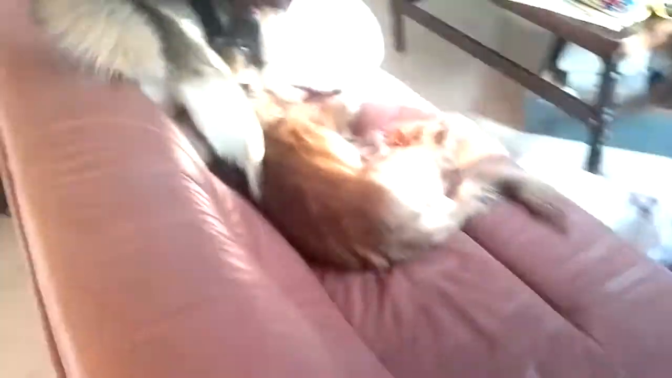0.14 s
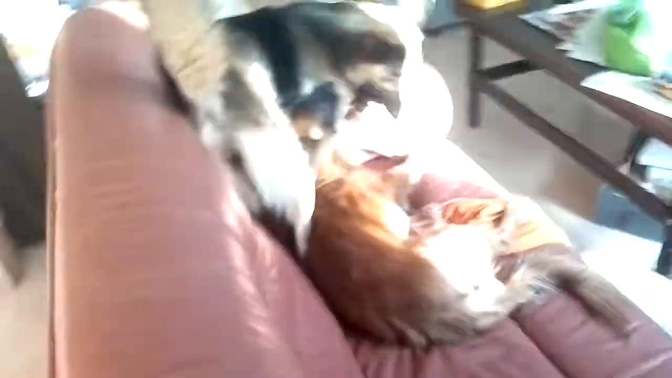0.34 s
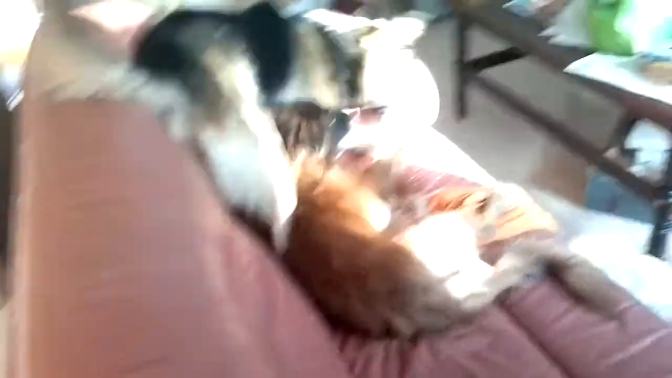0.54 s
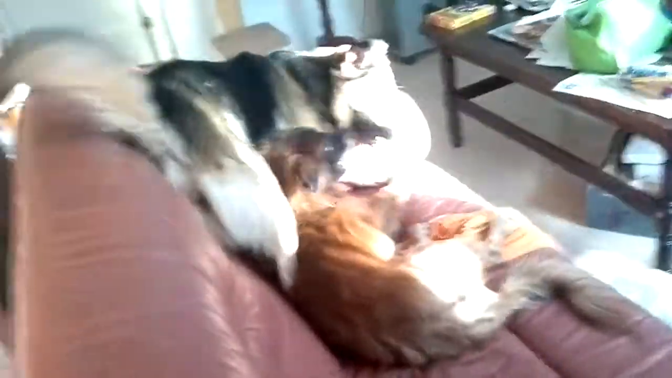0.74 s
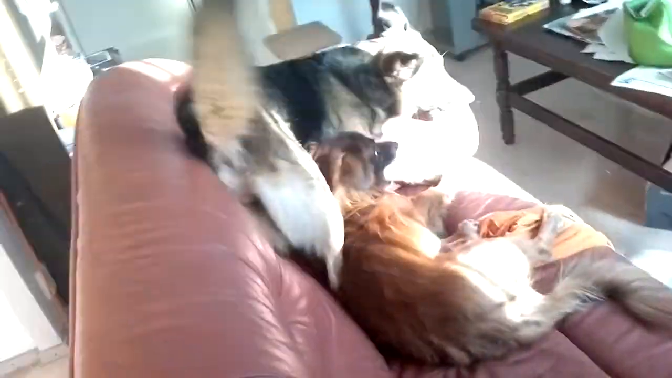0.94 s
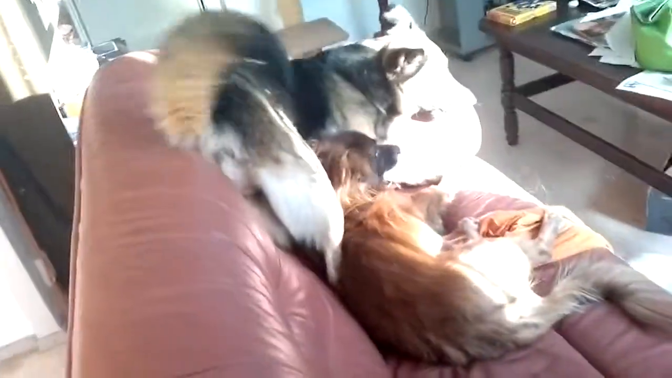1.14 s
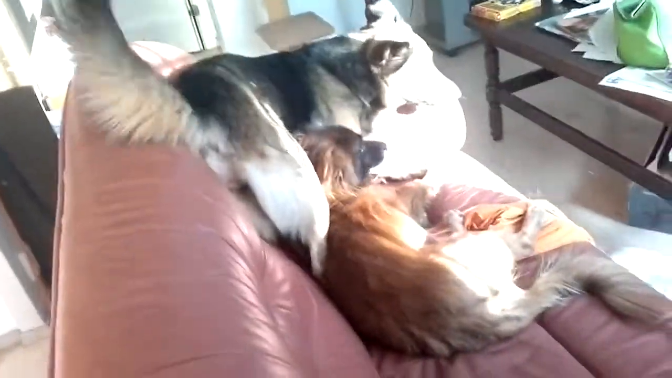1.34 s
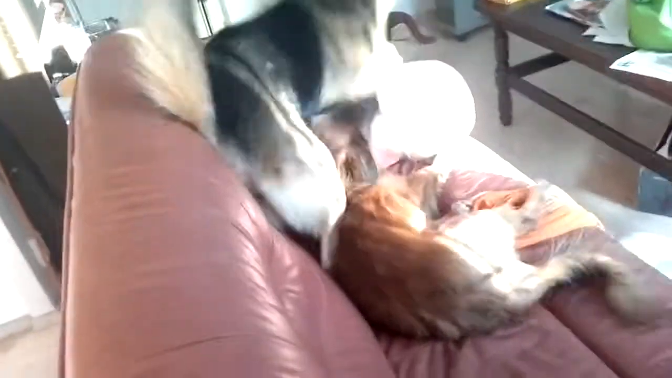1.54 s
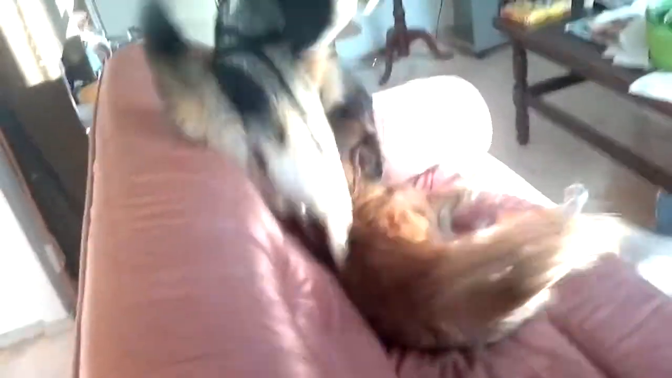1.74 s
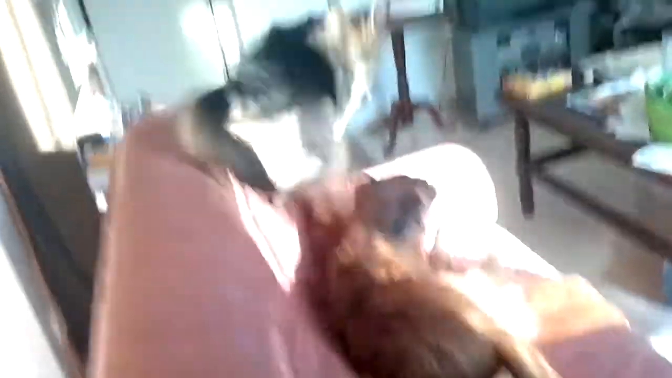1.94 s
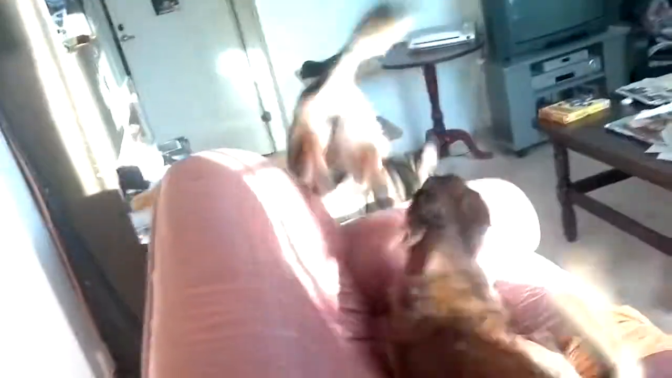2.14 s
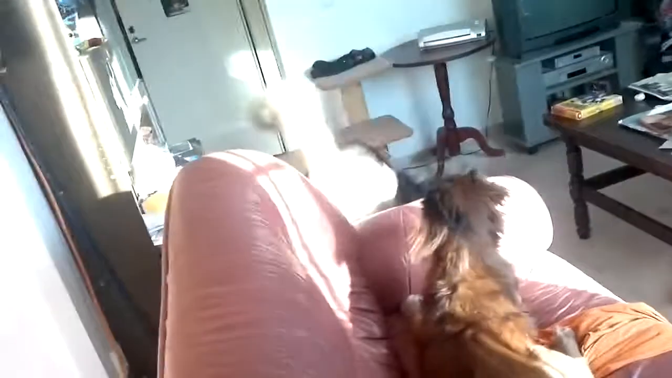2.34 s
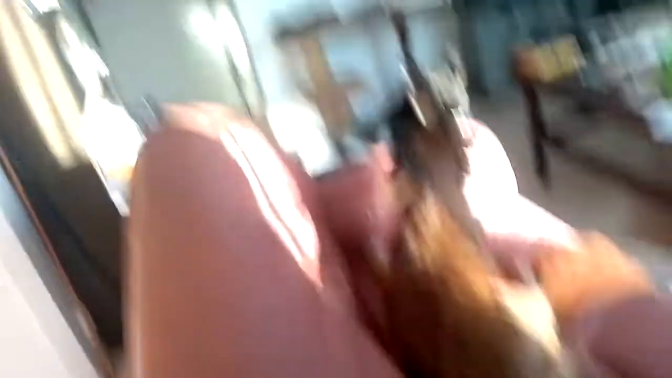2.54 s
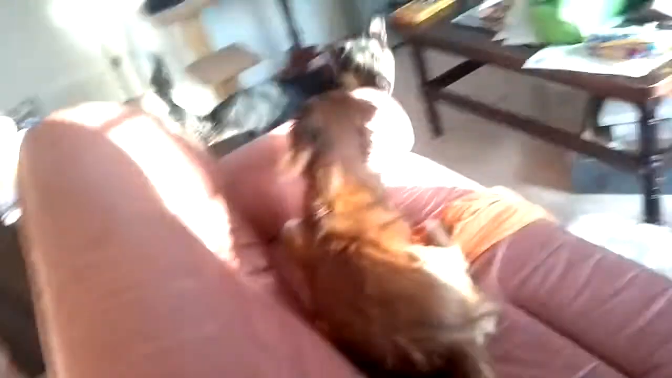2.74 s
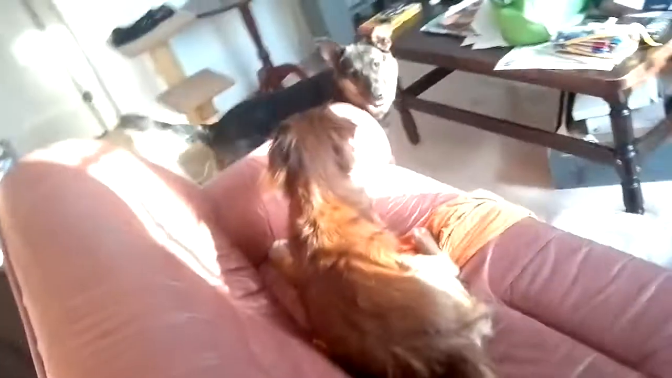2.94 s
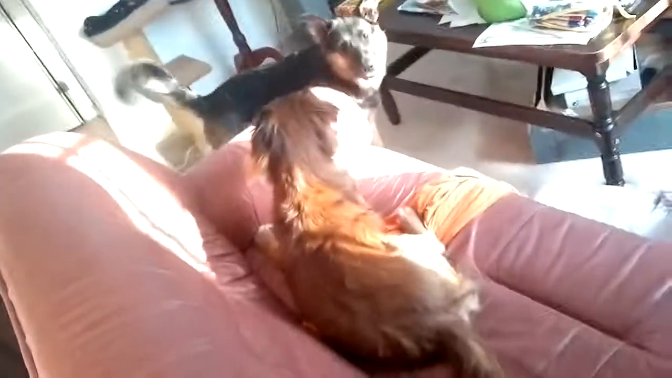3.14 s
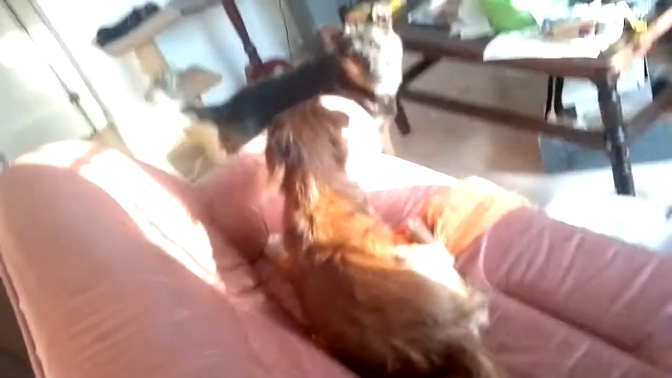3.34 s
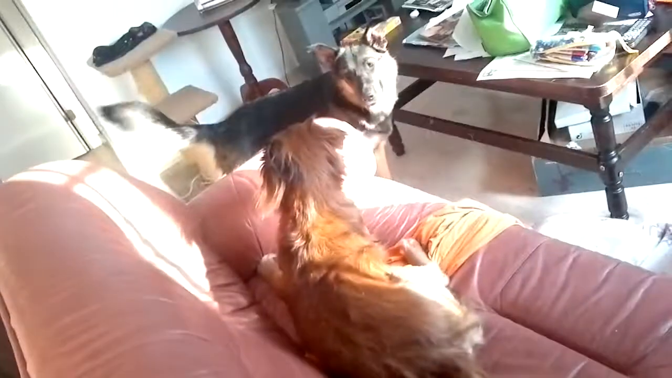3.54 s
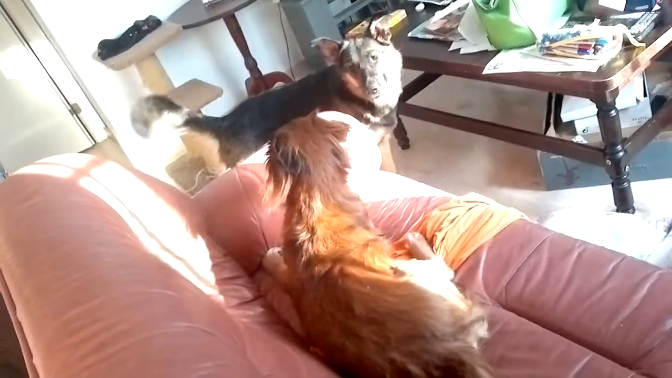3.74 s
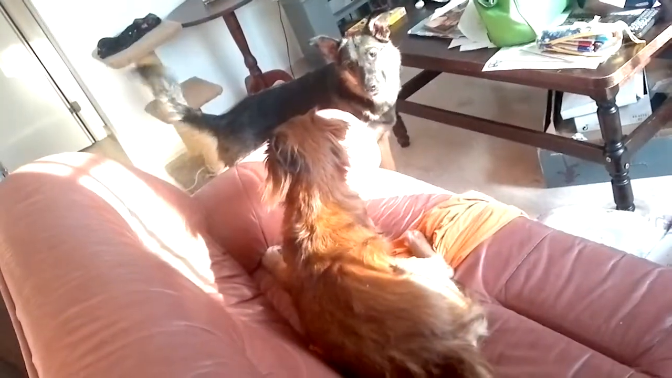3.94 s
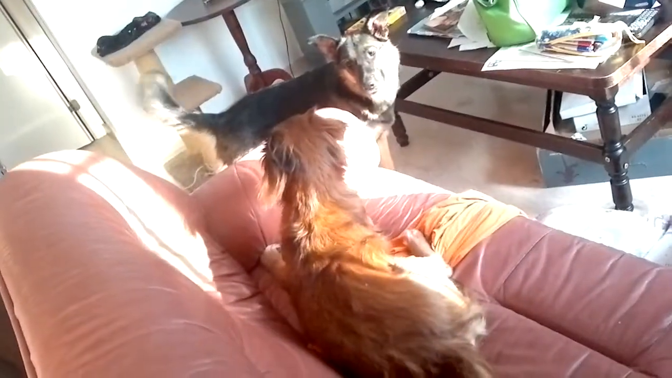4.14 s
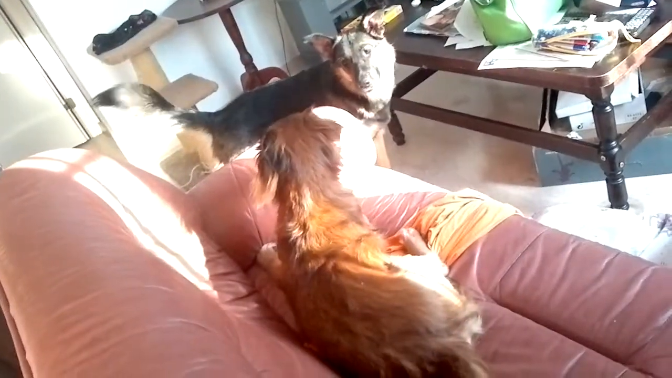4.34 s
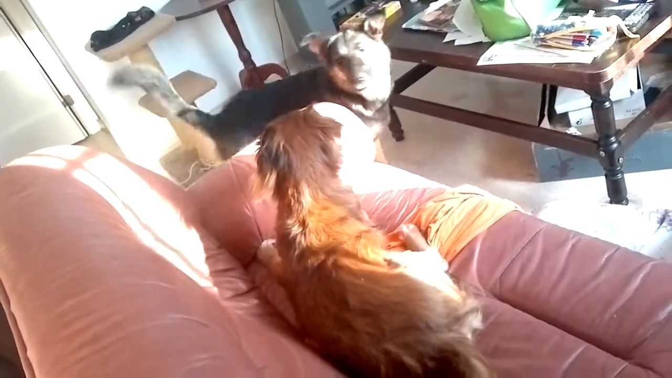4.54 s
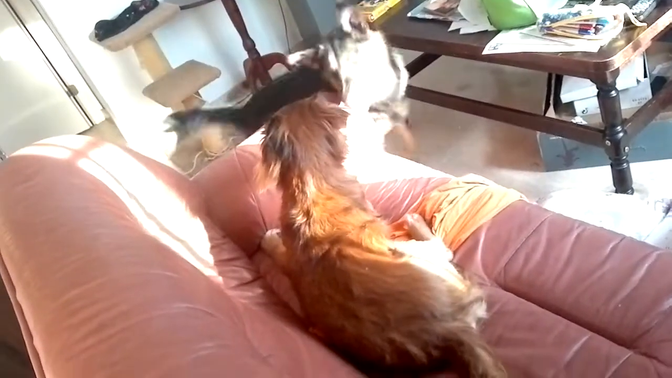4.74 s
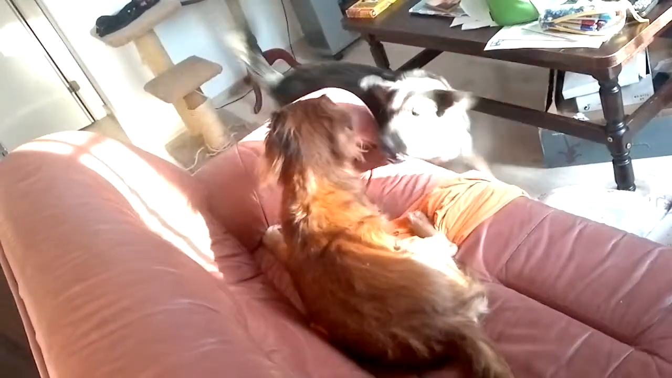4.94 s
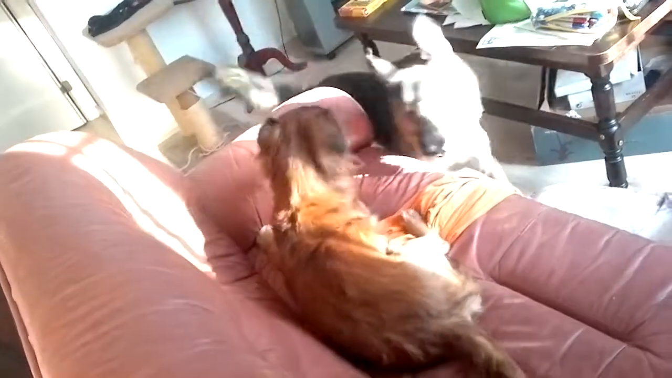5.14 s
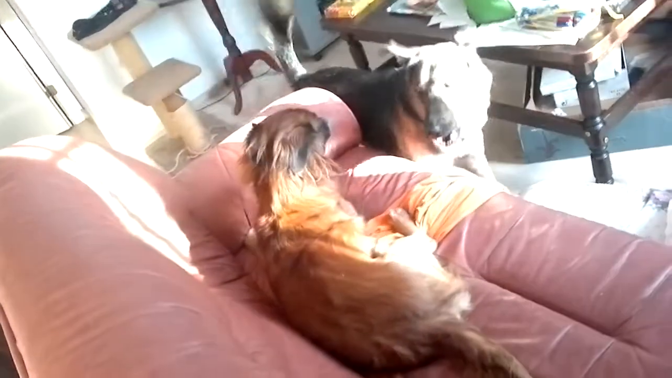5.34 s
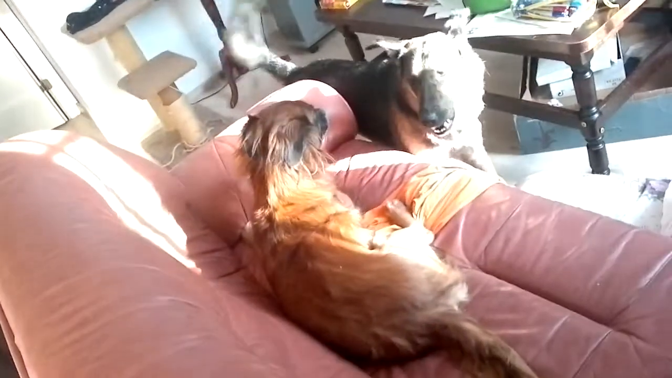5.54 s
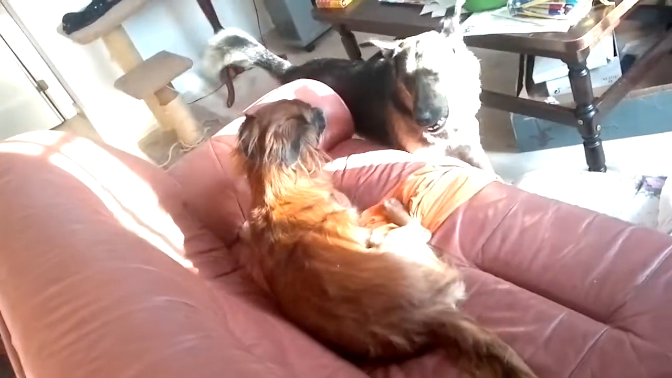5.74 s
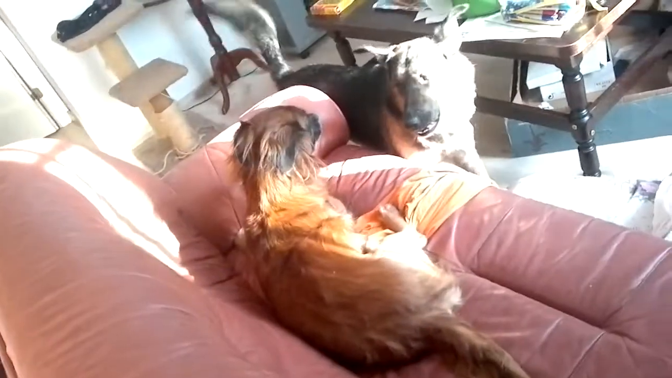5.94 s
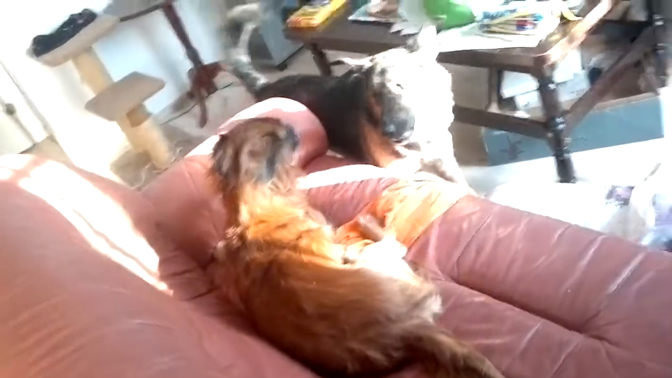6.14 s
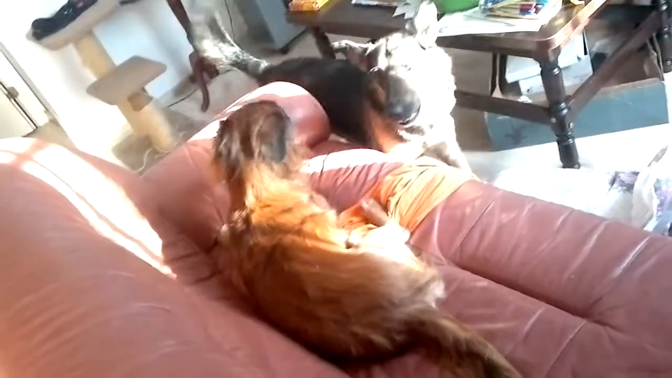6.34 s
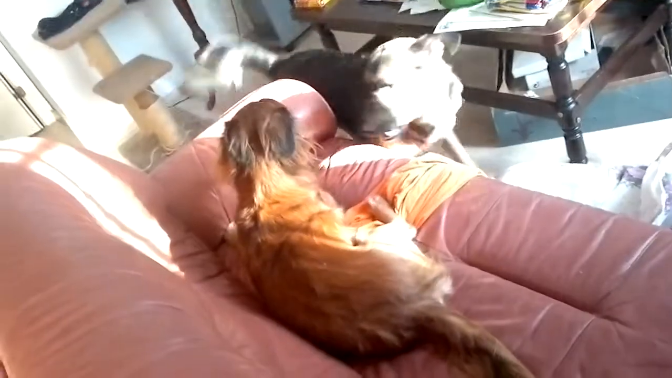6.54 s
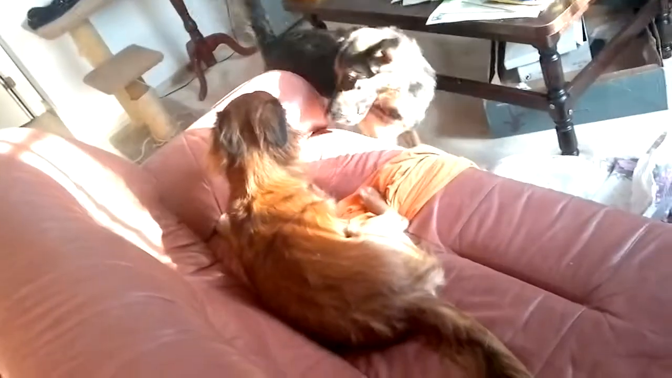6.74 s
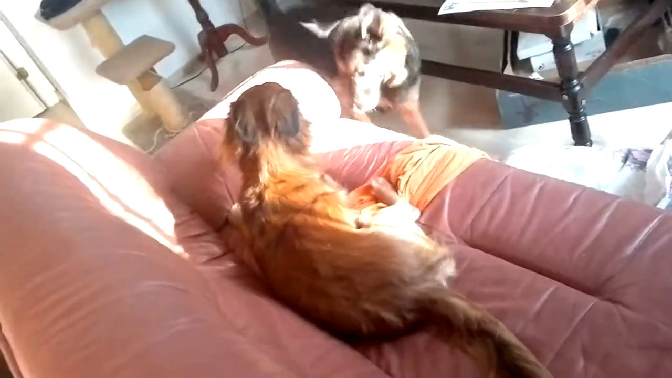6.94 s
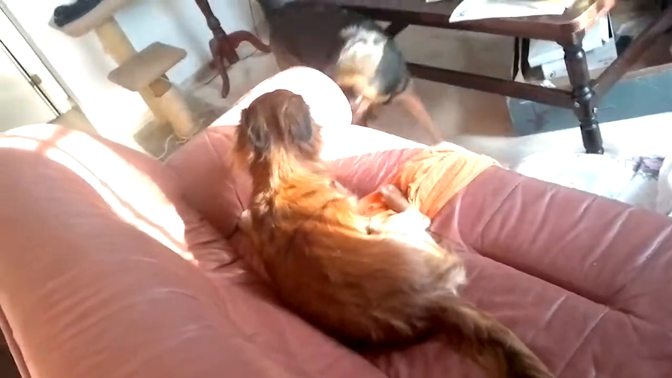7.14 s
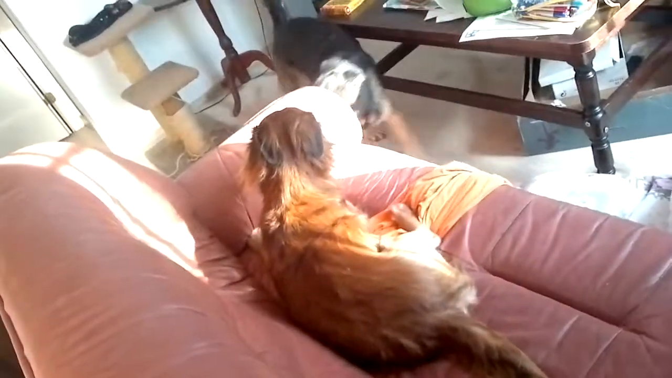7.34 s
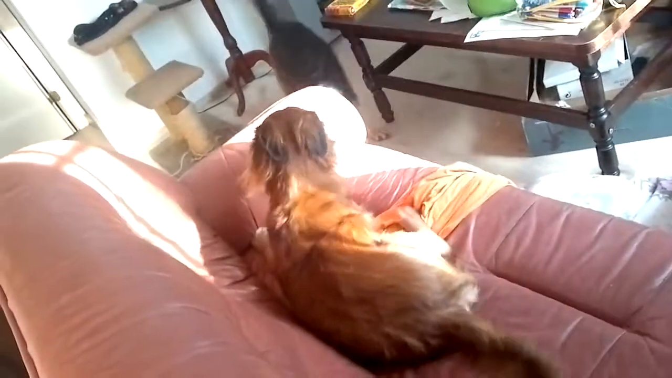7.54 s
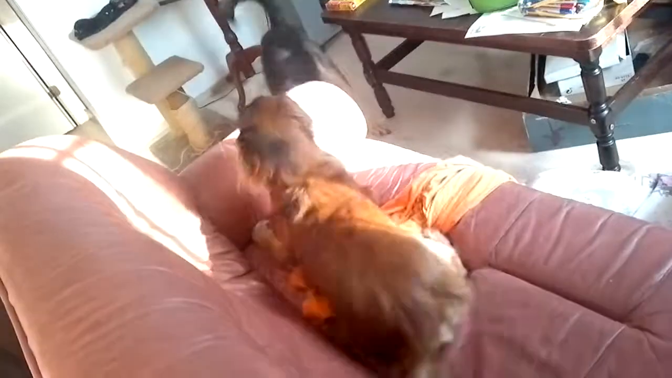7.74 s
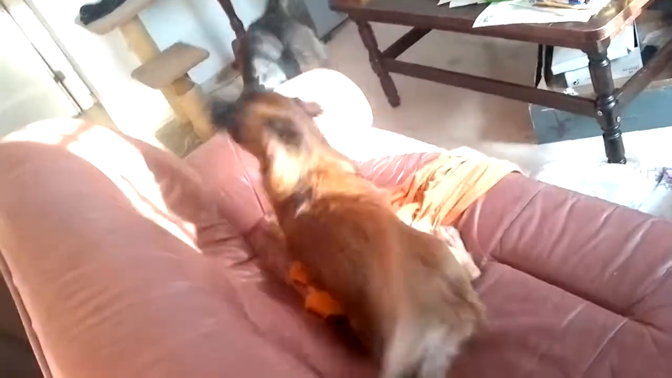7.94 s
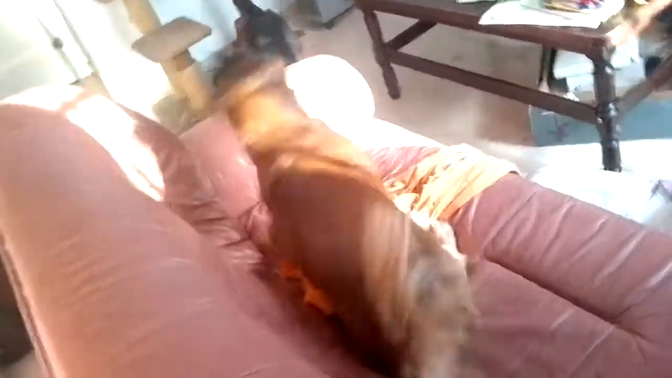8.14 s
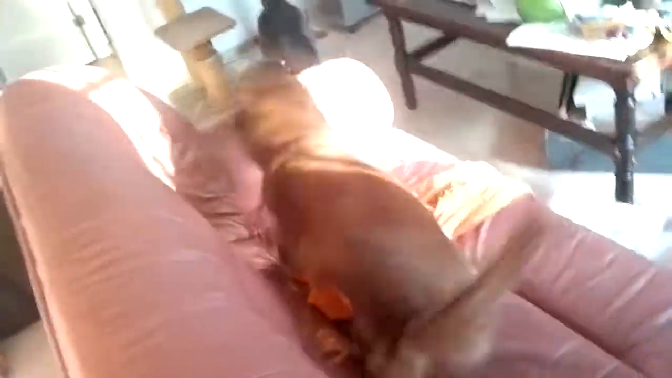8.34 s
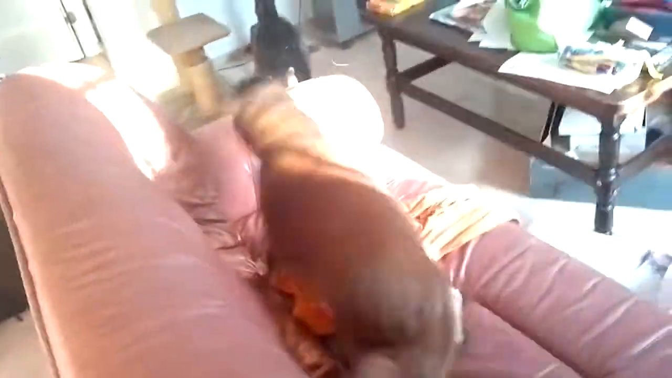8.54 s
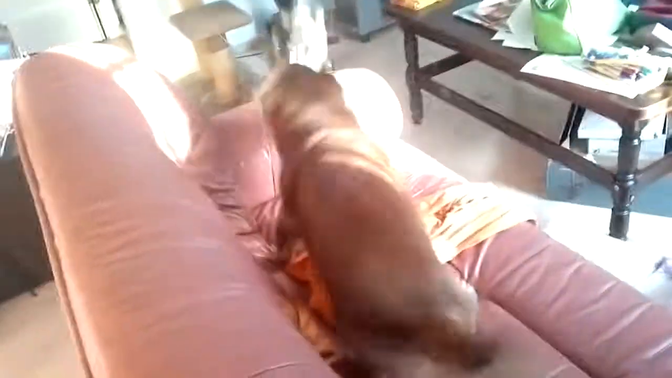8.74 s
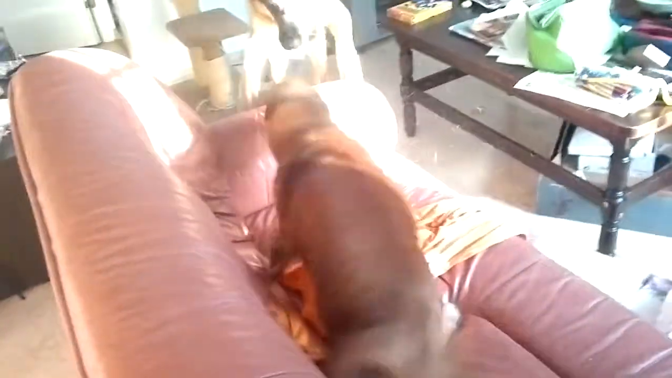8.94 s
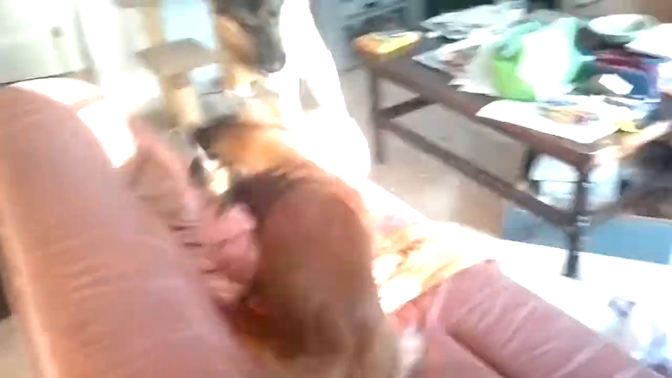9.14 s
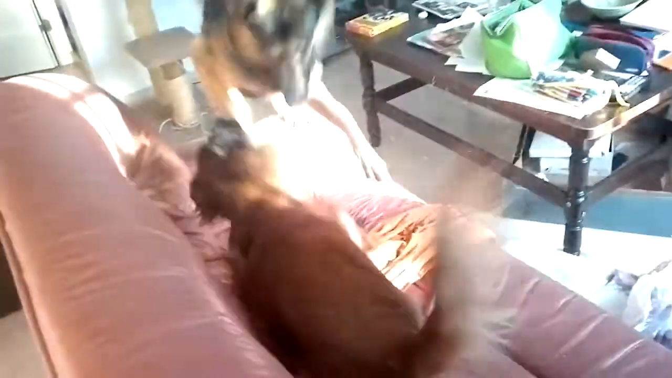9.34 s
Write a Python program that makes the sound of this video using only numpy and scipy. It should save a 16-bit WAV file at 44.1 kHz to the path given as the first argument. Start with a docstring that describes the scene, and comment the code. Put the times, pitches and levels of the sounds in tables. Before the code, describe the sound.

Close by indoors, playing dogs rustle and thump on leather cushions; one barks once, then come a snort, a sneeze and flapping ears.

```python
"""Two dogs play on and beside a leather couch, close to a hand-held camera; an appliance hums far off.
First claws tick, fur rubs the cushions and turbulent breath huffs; near 2 s landings ring the frame.
After a lull, one bark sounds through the resonances of the mouth at 4.9 s, and the camera turns its
gain down. The nose flaps in a snort at 6.3 s. At 8 s come a sneeze and a head shake with slapping
ears, then last thumps and a huff. The living room adds a short reverberation."""
import sys
import numpy as np
from scipy import signal
from scipy.fft import rfft, irfft, next_fast_len
from scipy.io import wavfile
from scipy.ndimage import uniform_filter1d, minimum_filter1d, map_coordinates

SR = 44100
rng = np.random.default_rng(int(sys.argv[2]) if len(sys.argv) > 2 else 0)


def wrap_up_sound(samples):
    """Save the sound to the file named by the first command line argument, as 16-bit audio."""
    columns = np.atleast_2d(samples).T
    # keep every value between -1 and 1, then stretch to whole-number steps
    tamed = np.clip(columns, -1, 1)
    steps = np.round(tamed * 32767).astype(np.int16)
    wavfile.write(sys.argv[1], SR, steps)


N = 418068
T = np.arange(N) / SR

# Levels are relative; rise_s and fall_s are the times taken to change by 20 dB.
# Spectrum of the room noise: frequency_hz, density_db
AIR_SPECTRUM = [(13, -42.5), (22, -13), (49, -3), (117, -14), (150, -1.5), (172, -12.5), (291, -6),
                (362, -14.5), (517, -17.5), (680, -17.5), (759, -18), (946, -21), (15600, -35)]
# Likeness of that noise at the two microphone ports: frequency_hz, correlation
AIR_CORRELATION = [(60, 0.2), (240, 0.58), (950, -0.14), (3770, -0.4), (15000, 0.37)]
# Partials of the appliance: frequency_hz, level_db
HUM_PARTIALS = [(48.4, -77.5), (145.3, -80.5), (290.7, -74), (387.6, -86), (511.4, -87.5)]

# Modes of the couch frame: centre_hz, width_hz, level_db
FRAME_MODES = [(37.25, 20, -11.5), (59.2, 6.4, 6), (116.4, 38, -0.5), (135.6, 24, 5), (188, 30, -2.5),
               (261, 34, -3), (420, 44, -6.5)]
# Spectra of creasing leather, rubbing fur and the finest rustle: frequency_hz, density_db
CREASE_SPECTRUM = [(120, -26), (200, 3.5), (368, 5.5), (534, 8), (842, 1), (1040, 2.5), (1880, -12.5),
                   (3500, -46), (4550, -53.5), (7700, -120)]
RUB_SPECTRUM = [(1060, -13), (1800, -3), (2650, -7), (3640, -8), (5240, -10.5), (5880, -18.5),
                (10000, -46.5), (13000, -59.5), (22000, -120)]
RUSTLE_SPECTRUM = [(4120, -22), (7000, 2.5), (10800, -8.5), (13300, -11), (15500, -22)]
# How restless the dogs are on the cushions: time_s, level_db
RESTLESSNESS = [(0, -64), (.25, -61.5), (.7, -57), (.84, -74), (1.4, -81), (1.55, -58.5), (1.8, -44),
                (2.15, -44.5), (2.4, -69), (2.95, -73), (3.12, -91.5), (7.4, -92.5), (7.6, -57),
                (7.72, -51), (8.2, -47.5), (8.95, -47), (9.3, -61), (9.48, -52)]
# How rumble, creasing, rubbing and rustle (a row each) follow restlessness: level_db, growth_db_per_db
STIR_RESPONSE = [(-49, 1.3), (-48.5, 2.02), (-69.5, 1), (-80, 0.7)]
# Shifts of weight: peak_s, rise_s, fall_s, rumble_db, crease_db
WEIGHT_SHIFTS = [(.062, 0.0089, 0.024, -54, -52), (.2, 0.032, 0.11, -47, -37),
                 (.44, 0.29, 0.027, -63, -45.5), (.538, 0.044, 0.14, -51.5, -57),
                 (.9, .05, 0.16, -70, -56.5), (1.1, 0.017, .1, -56.5, -59), (1.258, .05, 0.075, -76, -62),
                 (1.406, 0.035, 0.046, -47.5, -52), (1.506, 0.046, .15, -41, -61),
                 (1.598, 0.14, 0.062, -57, -39), (1.716, 0.047, 0.27, -38, -66),
                 (1.842, 0.034, 0.14, -22, -33), (1.904, 0.0021, 0.036, -17, -22),
                 (1.927, 0.029, 0.12, -13, -23.5), (2.085, .1, 0.058, -31, -31.5),
                 (2.211, .1, 0.068, -36, -50.5), (2.45, .015, 0.76, -68, -68),
                 (2.908, 0.029, 0.2, -64.5, -65.5), (4.796, 0.036, .2, -63, -56),
                 (4.895, .012, .012, -41.5, -49.5), (6.146, 0.055, 0.12, -64, -68),
                 (6.245, 0.034, .02, -59, -61.5), (6.38, .02, 0.043, -61, -63),
                 (6.578, 0.065, 0.17, -58.5, -42.5), (6.85, 0.073, 0.24, -64.5, -66.5),
                 (7.142, .15, .1, -61.5, -72), (7.238, .03, 0.16, -68, -63), (7.528, 0.13, .07, -55.5, -66),
                 (7.646, 0.047, 0.12, -48, -62), (7.72, 0.0033, 0.18, -21.5, -42),
                 (7.959, 0.03, 0.12, -43.5, -37), (8.075, 0.049, 0.23, -44.5, -34.5),
                 (8.998, 0.046, .17, -29, -34), (9.102, 0.045, 0.25, -48, -34),
                 (9.17, 0.075, .08, -23, -40), (9.384, 0.13, 0.027, -42.5, -44),
                 (9.47, 0.085, 0.085, -41, -47.5)]
# Strokes of fur and paws on leather: peak_s, rise_s, fall_s, rub_db, rustle_db
RUB_STROKES = [(.148, 0.044, .03, -43.5, -48.5), (.234, 0.096, 0.065, -51, -67.5),
               (.36, .07, 0.15, -52.5, -68), (.9, .04, .2, -75, -88.5), (1.1, .02, 0.15, -68, -73.5),
               (1.258, 0.046, .08, -67, -73), (1.406, 0.023, .09, -66.5, -76),
               (1.506, .09, .45, -66.5, -75.5), (1.842, 0.17, 0.11, -54.5, -73.5),
               (1.927, 0.035, .11, -37, -72.5), (2.085, 0.045, 0.075, -38, -69.5),
               (2.2, .1, 0.099, -59, -74.5), (2.45, 0.0088, .6, -69, -76), (2.62, 0.095, 0.24, -67, -69),
               (2.908, 0.031, .13, -64, -69.5), (4.864, 0.096, .1, -64.5, -76.5),
               (6.13, 0.032, 0.09, -76, -77.5), (6.245, .04, .02, -71, -89.5),
               (6.578, 0.12, 0.099, -64, -85), (6.708, .025, .09, -64.5, -74.5),
               (6.882, 0.056, 0.092, -73, -83), (7.004, 0.061, .15, -66, -84.5),
               (7.238, .04, 0.188, -71.5, -86), (7.496, 0.063, 0.072, -60.5, -72),
               (7.72, .02, 0.33, -59.5, -79), (7.833, .1, 0.11, -62, -79), (8.075, 0.04, 0.15, -45.5, -89),
               (8.998, .03, 0.12, -61, -74), (9.16, .05, 0.082, -48, -83), (9.384, .15, .15, -68, -83)]
# Ticks of claws and leather: start_s, level_db, ring_hz, snap_db
CLAW_TICKS = [(0.058, -35.5, 1100, -16), (0.173, -21, 1530, -30), (0.189, -20.5, 960, -43.5),
              (0.205, -24.5, 1074, -32.5), (1.096, -53, 1150, -19), (1.238, -54, 668, -19),
              (1.398, -50.5, 775, -17), (1.4, -54, 6000, -8), (1.544, -29.5, 640, -30.5),
              (1.588, -31, 630, -41.5), (1.708, -30.5, 603, -30), (1.826, -26.5, 620, -35),
              (1.905, -9, 520, -31), (2.589, -40.5, 1500, -16), (2.591, -47.5, 4300, -12),
              (6.059, -60, 8000, -7), (6.073, -58, 3000, -14), (6.135, -48, 1686, -16),
              (6.154, -55, 924, -21), (7.721, -31, 590, -34)]

# Gliding bands of breath: peak_s, level_db, rise_s, fall_s, centre_hz, glide_octaves_per_s
WHEEZES = [(.234, -53.5, .05, 0.068, 3790, 2.5), (.115, -42, 0.035, .08, 1490, 1.8),
           (.302, -43.5, .04, .14, 1600, .3), (.37, -52, 0.077, 0.093, 2470, 1),
           (.386, -49, 0.11, 0.045, 4520, 0.5), (.416, -50.5, 0.084, 0.062, 1860, 4),
           (.432, -45.5, .02, 0.036, 3290, 5.5), (.524, -62, 0.053, 0.056, 4190, 2),
           (1.67, -59, .07, .15, 4740, -2.4), (1.782, -52.5, 0.053, .05, 4870, -2),
           (1.848, -53, .045, .13, 3730, -0.1), (2.05, -35, 0.073, 0.06, 530, 1),
           (2.061, -29, .05, 0.091, 1170, .3), (2.066, -30.5, .055, 0.092, 1675, 1.3),
           (2.076, -34.5, .015, 0.086, 3470, -3), (6.52, -46, .05, 0.17, 1550, 1.7),
           (6.585, -41.5, 0.078, 0.05, 2700, 1.5), (6.6, -51, .08, 0.075, 2150, -1.5),
           (6.624, -59, .1, 0.092, 1530, 2), (6.99, -51, 0.058, .12, 2066, 1.5),
           (7.02, -51, 0.057, 0.054, 1600, .2), (7.49, -55.5, .04, 0.044, 3900, -1),
           (7.62, -53, 0.097, 0.17, 1950, 3.3), (7.76, -49, .1, 0.2, 1720, 1),
           (7.835, -58, 0.036, .04, 4900, -0.5), (7.96, -51, 0.077, 0.09, 1750, 0.5)]
# Throat resonances, grouped as main, lowest, low and upper: centre_hz, width_hz, level_db
THROAT_MODES = [
    [(1064, 200, 0)],
    [(502.6, 120, 0)],
    [(712, 180, 0)],
    [(1505, 230, 9.5), (2650, 800, 4.5)],
]
# Huffs of breath: peak_s, level_db, hold_s, rise_s, fall_s, lowest_db, low_db, upper_db
BREATHS = [(.204, -34, .005, 0.072, 0.039, -4.5, -10, -11.5),
           (.348, -38.5, .005, 0.14, 0.11, -12, -21, -30),
           (.432, -46.5, 0.0038, 0.16, 0.058, -3.5, -14, -8), (.76, -60, .005, 0.029, 0.047, -14, -23, -14),
           (.864, -57, 0.057, 0.016, 0.1, -6.5, -6.5, -21), (2.265, -44.5, .005, 0.043, 0.06, 1, 4, -7.5),
           (3.244, -66, 0.0052, 0.031, .09, -6.5, 0, -6), (4.224, -75.5, 0.048, .02, .1, -0.5, -1, -2.5),
           (4.534, -35, 0.017, 0.0038, .11, -2, 0.5, -47), (4.779, -63.5, .005, .03, .17, -13, -10.5, -4.5),
           (6.558, -31.5, 0.051, 0.05, 0.088, -10.5, -10, -16),
           (6.72, -53, 0.015, 0.079, 0.025, -19, -20, -25), (6.89, -70, .005, .12, .07, -4, -14, -11),
           (7.011, -51.5, .005, 0.092, 0.091, -16, -19.5, -7.5),
           (7.592, -55.5, 0.099, .03, .1, -18.5, -7, -8),
           (9.116, -30.5, 0.058, 0.042, 0.11, -13, -10.5, -14.5)]
# Low thumps of bodies landing on the couch, and a sharp huff's rumble at 4.5 s: start_s, level_db, slap_db
LOW_THUMPS = [(1.498, -42, -2), (1.748, -28.5, -3), (1.825, -17.5, -4), (1.906, -11, -7), (4.533, -38, 2.5),
              (4.561, -29.5, -6), (7.721, -18.5, -17.5), (8.98, -32, -1), (9.14, -21.5, -1),
              (9.361, -35, -8)]
# Course of the bark: time_s, pitch_hz, level_db, second_partial_db, cheek_db
BARK_CONTOUR = [(4.896, 610.8, -40.5, 0, -18), (4.907, 578, -38.5, -8.5, -21),
                (4.913, 562.3, -14, -5.5, -23.5), (4.936, 544.4, -19, -3.5, -5.5),
                (4.95, 515, -12.5, -3.5, -15), (4.99, 486.6, -12.5, 0, -6), (5.012, 524.8, -17.5, -2, 2),
                (5.028, 489, -8.5, -9.5, -20.5), (5.05, 497.2, -25, -16.5, -22),
                (5.08, 480, -17, -10.5, -22.5), (5.11, 448, -35, 1, -12)]
# Mouth resonances, grouped as cheek, jaws and rasp: centre_hz, width_hz, level_db
MOUTH_MODES = [
    [(1715, 200, 0)],
    [(1410, 360, 3.5), (2470, 360, -0.5), (2840, 350, -3), (3696, 330, -8)],
    [(4930, 470, 3), (6230, 620, 2.5), (8200, 1800, -4)],
]
# Flaps of the nose in the snort: start_s, level_db, ring_hz, push_db, fizz_db
NOSE_FLAPS = [(6.252, -31.5, 1050, -11, -14.5), (6.263, -23.5, 980, -7, -23),
              (6.273, -22.5, 1009, -18, -26), (6.278, -22.5, 553, -16, -10.5),
              (6.287, -18.5, 850, -29, -17.5), (6.302, -22.5, 750, 2.5, -13), (6.316, -14.5, 743, -25, -23),
              (6.333, -25, 694, -6.5, -22), (6.344, -19.5, 502, -26, -28), (6.397, -35.5, 447, -19, -38)]
# Ears striking the shaken head: start_s, level_db, ring_hz, flutter_db, swish_db
EAR_SLAPS = [(8.044, -34.5, 1500, 0, -12), (8.201, -39, 1550, -4, -10), (8.29, -34.5, 1060, -5, -13.5),
             (8.373, -33.5, 1040, -5.5, -20), (8.458, -33, 914, -9, -35), (8.539, -31, 990, -7, -21),
             (8.618, -36.5, 1010, -1, -17), (8.699, -28, 1070, -7, -18.5), (8.78, -28, 955, -9.5, -18),
             (8.855, -31.5, 1550, -3, -14), (8.935, -27.5, 1100, -9, -19), (8.988, -31, 1310, -8.5, -11)]
# Envelope of the sneeze: time_s, level_db
SNEEZE_CONTOUR = [(8.05, -63), (8.062, -43), (8.078, -31.5), (8.11, -40), (8.17, -49.5), (8.23, -74)]
# Nasal resonances: centre_hz, width_hz, level_db
NOSE_MODES = [(1250, 1200, 4.1), (3640, 350, 7.6), (5050, 290, 0.73)]

# Reflections from nearby walls reach the two ports unequally: frequency_hz, side_minus_mid_db
SIDE_SPECTRUM = [(30, -19), (125, -18), (250, -12), (500, -9), (1000, -8), (2000, -1), (4000, 1),
                 (15000, 0)]
# Balance of the close sound: frequency_hz, left_minus_right_db
BALANCE = [(30, .3), (500, 1.5), (1000, 2.9), (2500, 4.5), (5000, 3), (8000, -6), (15000, -7)]
# Reverberation time of the room: frequency_hz, t60_s
ROOM_DECAY = [(100, 0.59), (400, 0.45), (1500, 0.39), (8000, 0.46)]


def amp(db):
    """Amplitude ratio of a level in decibels."""
    return 10 ** (np.asarray(db) / 20)


def unit(x):
    """Normalisation to an rms of 1."""
    return x / np.sqrt(np.mean(x ** 2) + 1e-20)


def along(points, hz):
    """Interpolation of (frequency_hz, value) points on a logarithmic frequency axis."""
    f, values = np.transpose(points)
    return np.interp(np.log(hz + 1), np.log(f + 1), values)


def curves(rows):
    """Linear interpolation in time: the span of a table, a soft-edged gate and a curve per column."""
    times, *columns = np.transpose(rows)
    span = slice(max(round(times[0] * SR) - 100, 0), round(times[-1] * SR) + 100)
    gate = np.clip(np.minimum(T[span] - times[0], times[-1] - T[span]) * SR / 200 + .5, 0, 1)
    return [span, gate] + [np.interp(T[span], times, column) for column in columns]


def swell(peak_s, rise_s, fall_s, hold_s=0):
    """Exponential growth, hold and exponential decay: the span of an event and its gain."""
    span = slice(max(round((peak_s - 3 * rise_s) * SR), 0), round((peak_s + hold_s + 3 * fall_s) * SR))
    t = T[span] - peak_s
    return span, amp(-20 * np.maximum(0, np.maximum(-t / rise_s, (t - hold_s) / fall_s)))


def wobble(rate_hz, count=N):
    """Random modulation: a smooth curve through rate_hz random knots a second."""
    return map_coordinates(rng.standard_normal(int(count * rate_hz / SR) + 4), [T[:count] * rate_hz])


def filtered(x, response):
    """Linear filtering: the spectrum of x times a frequency response."""
    size = next_fast_len(x.shape[-1] + SR // 4)
    return irfft(rfft(x, size) * response(np.fft.rfftfreq(size, 1 / SR)), size)[..., :x.shape[-1]]


def resonator(modes):
    """Modal summation: the response of damped resonances of alternating sign."""
    return lambda f: sum((-1) ** k * amp(db) * 1j * f * width / (hz * hz - f * f + 1j * f * width)
                         for k, (hz, width, db) in enumerate(modes))


def shaped(spectrum):
    """Zero-phase response through (frequency_hz, level_db) points."""
    return lambda hz: amp(along(spectrum, hz))


def lowpass(hz):
    """Causal fourth-order loss of treble."""
    return lambda f: 1 / (1 + 1.4j * f / hz - (f / hz) ** 2) ** 2


def hiss(response, grain_db=0, grain_hz=100, count=N):
    """Filtered noise of rms 1, made grainy by random amplitude modulation."""
    noise = rng.standard_normal(count) * amp(grain_db * wobble(grain_hz, count))
    return unit(filtered(noise, response))


def resonant_hiss(modes, count=N, **grain):
    """Source and filter: noise passed twice through a set of resonances, at an rms of 1."""
    return hiss(lambda f: resonator(modes)(f) ** 2, count=count, **grain)


def ring(hz, t60_s, roughness):
    """Damped free vibration after a blow, roughened by noise."""
    t = T[:SR // 8]
    rough = 1 + roughness * uniform_filter1d(rng.standard_normal(len(t)), size=16)
    return amp(-60 * t / t60_s) * (1 - np.exp(-t * hz * 6)) * np.sin(2 * np.pi * hz * t) * rough


def add(out, start_s, sound):
    """Superposition of a sound on out, from start_s onward."""
    part = out[round(start_s * SR):][:len(sound)]
    part += sound[:len(part)]


def room_noise(level_db=-67.5):
    """Partial coherence: the ratio of mid to side noise sets how alike the two channels are."""
    def response(hz):
        angle = np.arccos(np.clip(along(AIR_CORRELATION, hz), -1, 1)) / 2
        return amp(along(AIR_SPECTRUM, hz)) * [np.cos(angle), np.sin(angle)]
    mid, side = filtered(rng.standard_normal((2, N)), response)
    return amp(level_db) * unit(np.array([mid + side, mid - side]))


def appliance_hum():
    """A line spectrum whose partials wander slightly in amplitude and phase."""
    return sum(amp(db + 3 + 1.5 * wobble(11)) * np.sin(2 * np.pi * hz * T + .4 * wobble(4.1))
               for hz, db in HUM_PARTIALS)


def cushions():
    """Forced vibration and friction: moving weight rumbles in the frame, leather creases, fur rubs."""
    rumble = hiss(lambda f: resonator(FRAME_MODES)(f) / (1 + (f / 350) ** 4), grain_db=1, grain_hz=25)
    crease = hiss(shaped(CREASE_SPECTRUM), grain_db=1.5, grain_hz=80)
    rub = hiss(shaped(RUB_SPECTRUM), grain_db=1.5, grain_hz=170)
    rustle = hiss(shaped(RUSTLE_SPECTRUM))
    restless_db = np.interp(T, *np.transpose(RESTLESSNESS)) + 48
    gains = [amp(db + growth * restless_db) for db, growth in STIR_RESPONSE]
    for events, pair in (WEIGHT_SHIFTS, gains[:2]), (RUB_STROKES, gains[2:]):
        for peak_s, rise_s, fall_s, *levels_db in events:
            span, envelope = swell(peak_s, rise_s, fall_s)
            for gain, db in zip(pair, levels_db):
                gain[span] = np.hypot(gain[span], amp(db) * envelope)  # incoherent sounds add in power
    return sum(gain * layer for gain, layer in zip(gains, [rumble, crease, rub, rustle]))


def ticks():
    """Impact excitation of claws and leather: a bright snap and a ring that dies in 13 cycles."""
    out, t = np.zeros(N), T[:SR // 8]
    for start_s, db, hz, snap_db in CLAW_TICKS:
        snap = amp(snap_db - 60 * t / .01) * np.diff(rng.standard_normal(len(t) + 1)) / 2
        add(out, start_s, amp(db) * (ring(hz, 13 / hz, .24) + snap))
    return filtered(out, lowpass(11000))


def wheezes():
    """A moving resonance: narrow bands of breath noise glide as the mouth changes shape."""
    out = np.zeros(N)
    for peak_s, db, rise_s, fall_s, hz, glide in WHEEZES:
        span, gain = swell(peak_s, rise_s, fall_s)
        centre_hz = hz * 2 ** (glide * (T[span] - peak_s))
        band = wobble(.3 * hz, len(gain)) * np.sin(2 * np.pi * np.cumsum(centre_hz) / SR)
        out[span] += gain * amp(db - 2.5) * band
    return out


def huffs():
    """Turbulence: slightly fluttering breath excites four groups of throat resonances."""
    main, *bands = [resonant_hiss(group, grain_db=2.5, grain_hz=31) for group in THROAT_MODES]
    out = np.zeros(N)
    for peak_s, db, hold_s, rise_s, fall_s, *bands_db in BREATHS:
        span, gain = swell(peak_s, rise_s, fall_s, hold_s)
        colour = sum(amp(band_db) * band[span] for band_db, band in zip(bands_db, bands))
        out[span] += gain * amp(db) * (main[span] + colour)
    return out


def thumps():
    """Impulse response: a slap and a 2 ms pulse ringing low modes, for landings and one huff's rumble."""
    pulses, slaps = np.zeros((2, N))
    for start_s, db, slap_db in LOW_THUMPS:
        add(pulses, start_s, amp(db + 12) * np.hanning(SR // 500))
        add(slaps, start_s, amp(db + slap_db - 2.5) * ring(380, .031, .23))
    return slaps + filtered(pulses, resonator(FRAME_MODES))


def bark():
    """Voicing with jitter and shimmer: two strong partials, with breath noise in the mouth's formants."""
    span, gate, pitch_hz, db, second_db, cheek_db = curves(BARK_CONTOUR)
    cheek_modes, jaw_modes, rasp_modes = MOUTH_MODES
    n = len(gate)
    t = T[:n]
    roughness = np.clip(.45 + 4.4 * np.maximum(T[span] - 5.06, 0), 0, 1)  # grows as the bark dies
    phase = 2 * np.pi * np.cumsum(pitch_hz * (1 + .06 * roughness * wobble(150, n))) / SR
    first = amp(4.5 * roughness * wobble(90, n)) * np.sin(phase)
    second = amp(second_db + 6 * roughness * wobble(120, n)) * np.sin(2 * phase + 1)
    hoarse = resonant_hiss([(450, 150, 0)], n)
    breath = resonant_hiss([(380, 260, 0), (1080, 350, 0)], n)
    voice = 1.1 * first + 1.4 * second + .6 * hoarse + roughness * breath

    cheek = amp(cheek_db) * resonant_hiss(cheek_modes, n)
    opening = np.clip((t - .02) / .037, .1, 1) * amp(41.5 * t)
    puffs = np.exp(.5 * np.cos(phase))  # one a cycle
    jaws = amp(-22) * opening * puffs * resonant_hiss(jaw_modes, n)
    attack = amp(-19 - 60 * t / .36) * resonant_hiss([(2400, 500, 0)], n)
    rasp_onset = np.clip((t - .03) / .025, 0, 1)  # comes once the jaws are wide
    rasp = rasp_onset * amp(-33.5 - 60 * np.maximum(t - .11, 0) / .25) * resonant_hiss(rasp_modes, n)
    chest = amp(-15.5 - 60 * t / .44) * hiss(resonator([(60, 150, -6), (248, 140, -3.5)]), count=n)
    sound = gate * amp(db + 8.5) * (voice + cheek + jaws + attack + rasp + chest)
    out = np.zeros(N)
    out[span] = filtered(sound, lowpass(9000))
    return out


def snort():
    """Interrupted airflow: each flap rings the nose, rasps, pushes air at the microphone and fizzes."""
    out, t = np.zeros(N), T[:SR // 8]
    fizz_modes = [(3200, 500, 0), (4800, 1000, -1), (8500, 5000, -6)]
    for start_s, db, hz, push_db, fizz_db in NOSE_FLAPS:
        push = amp(push_db - 60 * t / .045) * np.sin(2 * np.pi * 130 * t)
        fizz = amp(fizz_db + 2 - 60 * t / .023) * resonant_hiss(fizz_modes, len(t))
        rasp = amp(-20 - 60 * t / .11) * resonant_hiss([(hz * .6, hz, 0)], len(t))
        add(out, start_s, amp(db) * (ring(hz, .026, .15) + rasp + push + fizz))
    return filtered(out, lowpass(7400))


def head_shake():
    """Heavily damped impacts: each ear slap leaves a dying flutter and a later swish of fur."""
    out, t = np.zeros(N), T[:SR // 8]
    flutter_spectrum = [(150, -5.5), (500, 8.5), (1300, 8.5), (2000, -2.5), (4000, -20), (12000, -55)]
    flutter_noise = hiss(shaped(flutter_spectrum), grain_db=2, grain_hz=200)
    fur_noise = resonant_hiss([(3500, 3000, 0)])
    swish_envelope = np.exp(-((t - .028) / .025) ** 2)
    for start_s, db, hz, flutter_db, swish_db in EAR_SLAPS:
        span = slice(round(start_s * SR), round(start_s * SR) + len(t))
        slap = 1.7 * ring(hz, .019, .47) + .81 * ring(1590, .02, .4)
        flutter = amp(flutter_db - 60 * t / .36) * flutter_noise[span]
        swish = amp(swish_db) * swish_envelope * fur_noise[span]
        add(out, start_s, amp(db) * (slap + flutter + swish))
    return filtered(filtered(out, lowpass(3250)), lowpass(11000))


def sneeze():
    """A burst of turbulence filtered by the nasal resonances."""
    span, gate, db = curves(SNEEZE_CONTOUR)
    out = np.zeros(N)
    out[span] = gate * amp(db) * resonant_hiss(NOSE_MODES, len(db))
    return out


def microphone_ports(x):
    """Mid and side: both ports share the direct sound and take early reflections in opposite phase."""
    smear = rng.standard_normal(SR // 8) * amp(-60 * T[:SR // 8] / .046)
    reflections = signal.fftconvolve(x, smear / np.linalg.norm(smear))[:N]
    side = filtered(reflections, shaped(SIDE_SPECTRUM))
    return filtered(np.array([x + side, x - side]), lambda hz: amp(along(BALANCE, hz) * [[.5], [-.5]]))


def reverberation(x):
    """A diffuse field: each frequency decays at its own rate, and the bass is alike in both ports."""
    hz, t, spectra = signal.stft(rng.standard_normal((2, SR * 3 // 4)), SR, nperseg=256)
    decay = amp(-60 * t / along(ROOM_DECAY, hz)[:, None])
    mid_side_gain = amp([0 * hz, along(SIDE_SPECTRUM, hz)])[:, :, None]
    mid, side = signal.istft(spectra * decay * mid_side_gain, SR, nperseg=256)[1]
    response = np.array([mid + side, mid - side]) / np.linalg.norm(mid)
    delayed = np.pad(x, (400, 0))  # 9 ms
    return signal.fftconvolve(delayed[None], response, axes=1)[:, :N]


def scene():
    """Superposition of direct sound, reverberation and background; the bark excites the room most."""
    background = room_noise() + appliance_hum()
    play = cushions() + ticks() + wheezes() + huffs() + thumps()
    voice = bark()
    play += snort() + head_shake() + sneeze()
    return microphone_ports(voice + play) + reverberation(amp(-6) * voice + amp(-20.5) * play) + background


def record(dry):
    """Automatic gain control: loud sound cuts the gain, which waits and recovers; then peak and band limits."""
    threshold_db, max_cut_db, recovery_db_per_s, hold_samples = -8.5, 11, 13, SR // 2
    ceiling, top_hz = .82, 15714
    power = uniform_filter1d(np.mean(dry ** 2, 0), size=SR // 12)
    level_db = 10 * np.log10(np.abs(power) + 1e-12)
    cut_db = np.clip(level_db - threshold_db, 0, max_cut_db)
    held_db = -minimum_filter1d(-np.pad(cut_db, (hold_samples // 2, 0)), size=hold_samples)[:N]
    released_db = np.maximum.accumulate(held_db + recovery_db_per_s * T) - recovery_db_per_s * T
    levelled = dry * amp(-released_db)
    peak_gain = np.minimum(1, ceiling / (np.abs(levelled).max(0) + 1e-9))
    limiter_gain = uniform_filter1d(minimum_filter1d(peak_gain, size=SR // 100), size=SR // 100)
    return filtered(levelled * limiter_gain, lambda hz: hz < top_hz)


dry = scene()
out = record(dry)
wrap_up_sound(out)
```